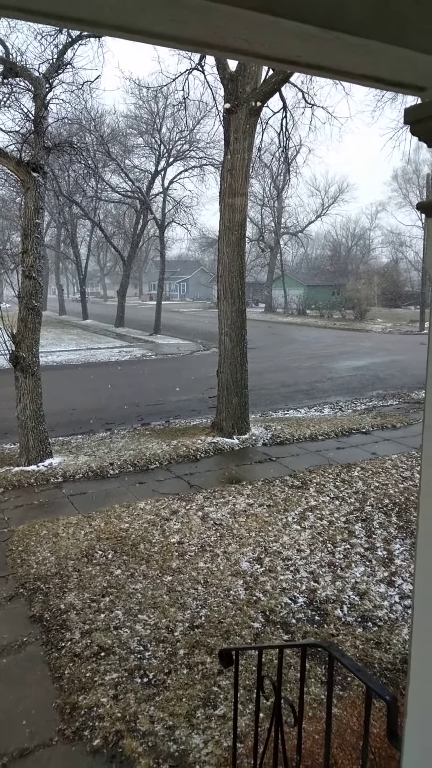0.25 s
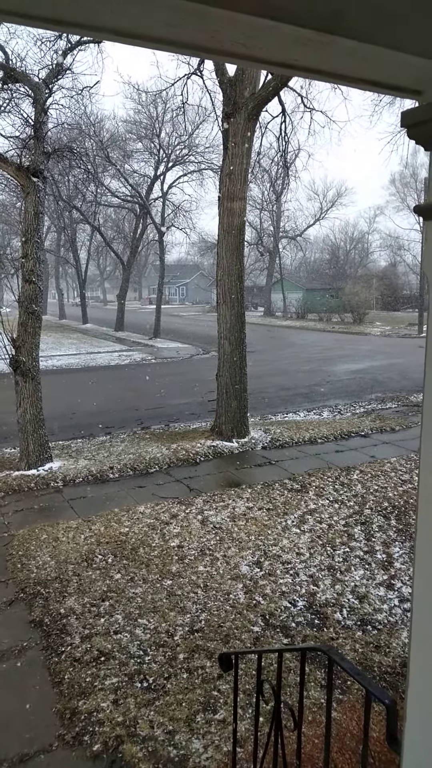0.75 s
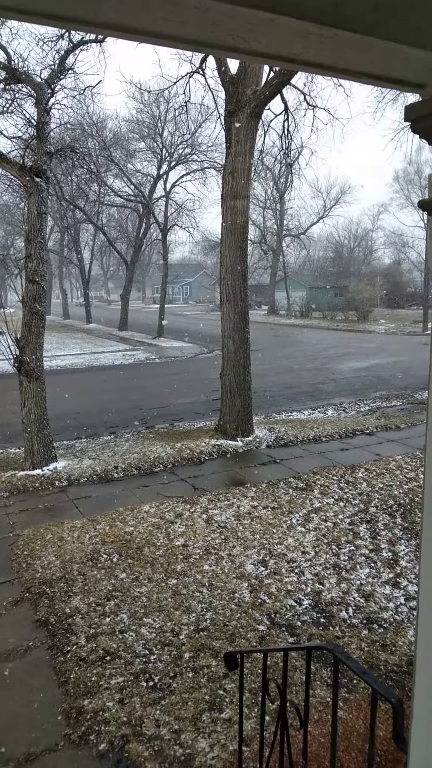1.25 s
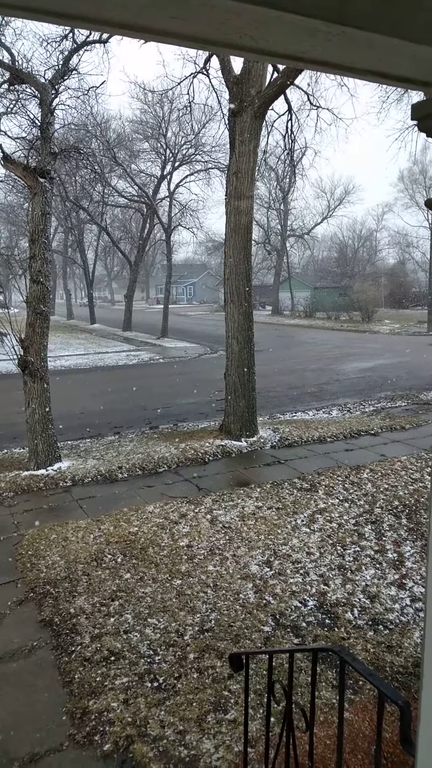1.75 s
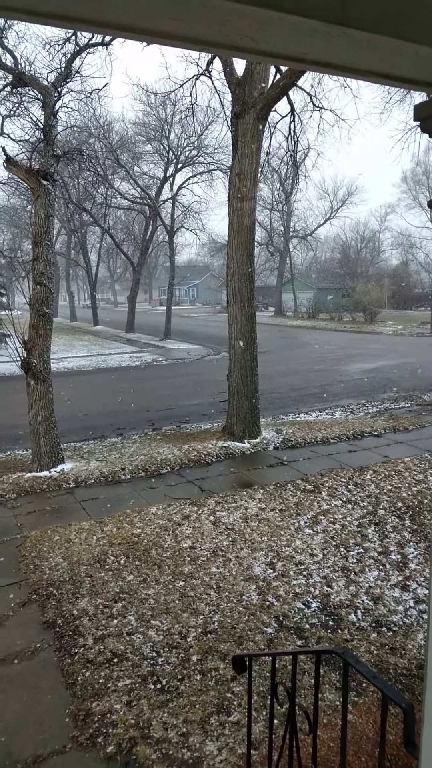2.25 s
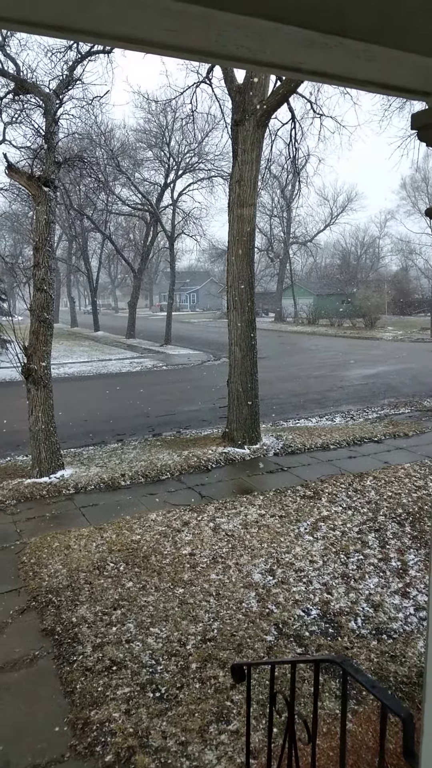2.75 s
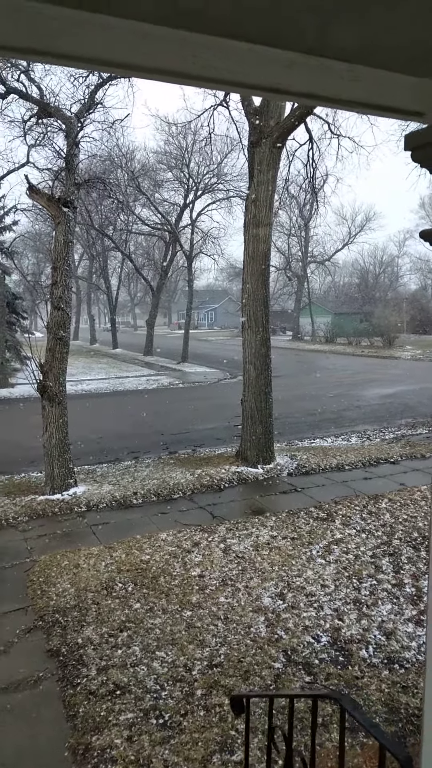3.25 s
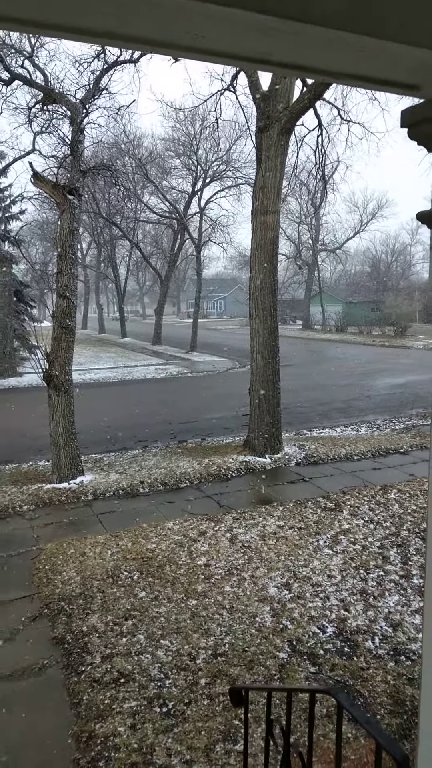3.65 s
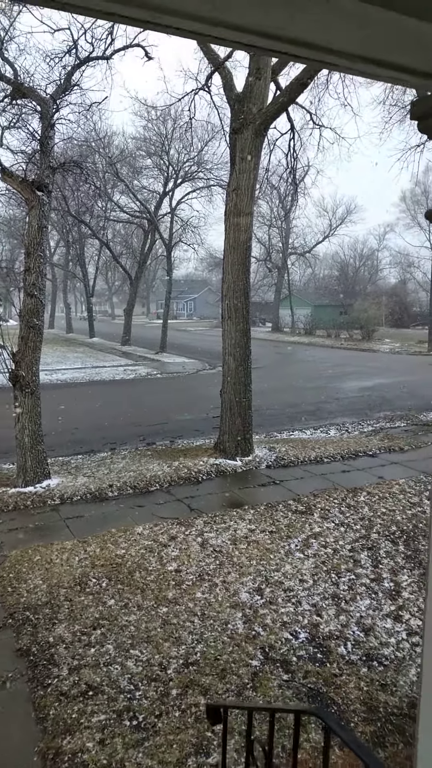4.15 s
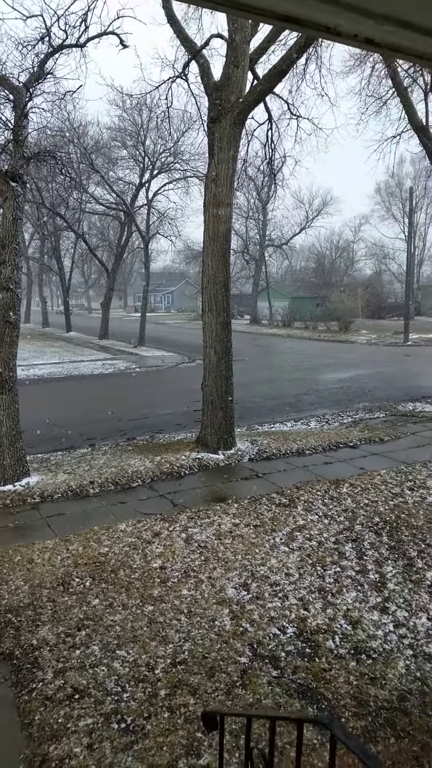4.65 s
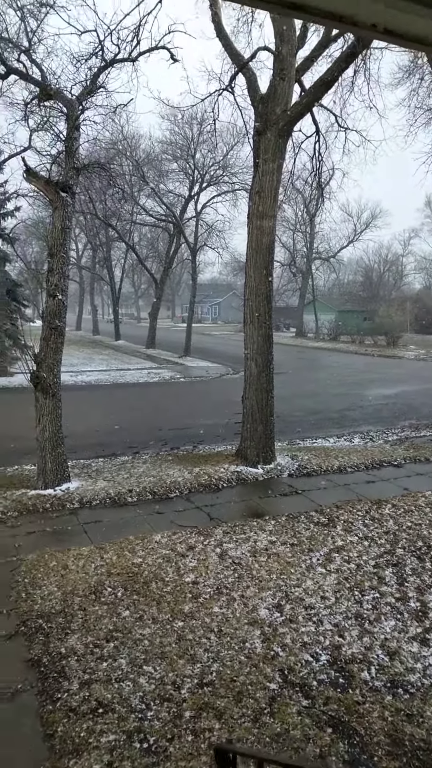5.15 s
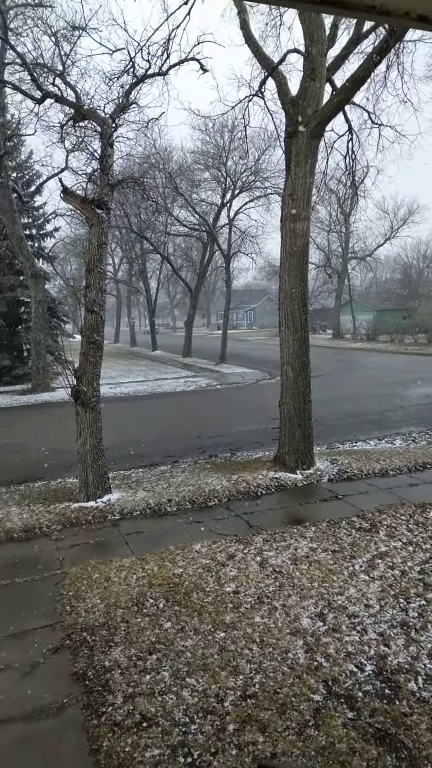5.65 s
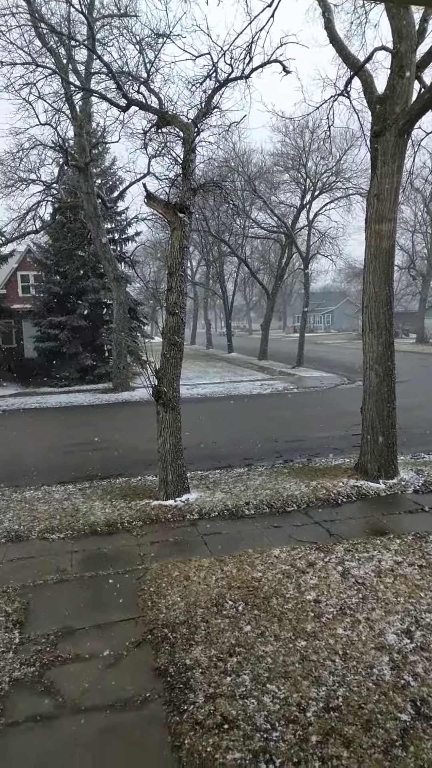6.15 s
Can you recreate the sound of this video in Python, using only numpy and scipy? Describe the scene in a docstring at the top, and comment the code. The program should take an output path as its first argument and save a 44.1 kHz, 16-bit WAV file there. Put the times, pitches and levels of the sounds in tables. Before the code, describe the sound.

Hard snow pellets tick irregularly with short grainy fizzes over a low steady town rumble and faint engine hum, with three brief hissy gusts.

```python
"""Snow pellets on a front garden

Heard from under a porch roof: hard pellets tick amid short bursts of grainy fizz, each ending abruptly.
Ticks and fizzes are filtered noise bursts with a ringing pitch; a few gusts hiss past with many fine grains.
Behind them the far shower hisses and patters, and a distant engine hums in the rumble and roar of the town.
Soft low swells of wavering tone come and go, and puffs of low noise thud on the two microphone ports."""
import sys
import numpy as np
from scipy import signal
from scipy.fft import rfft, irfft
from scipy.io import wavfile

SR = 44100
rng = np.random.default_rng(int(sys.argv[2]) if len(sys.argv) > 2 else 0)


def waveform_to_disk(signal):
    """Save audio, clipped to [-1, 1], as 16-bit WAV at the path in sys.argv[1]."""
    frames = np.transpose(np.atleast_2d(signal))
    scaled = np.clip(frames, -1, 1) * 32767
    samples = np.round(scaled).astype(np.int16)
    wavfile.write(sys.argv[1], SR, samples)


N = 282240
TIME = np.arange(N) / SR
TOP_HZ = 15900  # upper limit of ringing pitches and of the whole sound


def undb(db):
    """Turn decibels into an amplitude gain."""
    return 10 ** (np.asarray(db) / 20)


def unit(x):
    """Scale to an rms of one."""
    return x / np.sqrt(np.mean(x ** 2) + 1e-20)


def response(points, size):
    """Gain of a (freq_hz, level_db) outline at the bins of a transform, drawn over log frequency."""
    hz, db = np.transpose(points)
    bins_hz = np.fft.rfftfreq(size, 1 / SR) + 1
    return undb(np.interp(np.log(bins_hz), np.log(hz), db))


def colour(x, points, tilt_db=0, ring_hz=4000, ring_db=0, ring_octaves=0.15, keep_power=True, size=1024):
    """Causal, minimum-phase filter: an outline, a tilt in dB per octave and one broad resonance."""
    hz = np.fft.rfftfreq(size, 1 / SR) + 1
    octaves = np.log2(np.clip(hz, 1500, 10000) / 4000)  # the tilt levels off outside this range
    bump = 1 / (1 + (np.log2(hz / ring_hz) / ring_octaves) ** 2)
    gain = response(points, size) * undb(tilt_db * octaves + ring_db * bump)
    if keep_power:
        gain = unit(gain)
    # folding the cepstrum forward in time makes the filter minimum phase
    cepstrum = irfft(np.log(gain))
    cepstrum[1:size // 2] *= 2
    cepstrum[size // 2 + 1:] = 0
    kernel = irfft(np.exp(rfft(cepstrum)))
    return signal.fftconvolve(np.atleast_2d(x), kernel[None], axes=1)[:, :x.shape[-1]]


def noise(points, likeness):
    """Coloured stereo noise of rms one; likeness is the correlation of left and right."""
    spectra = rfft(rng.standard_normal((2, N))) * response(points, N)
    mid, side = irfft(spectra, N)
    return unit(np.sqrt(1 + likeness) * mid + np.sqrt(1 - likeness) * np.array([side, -side]))


def walk(rate):
    """Slow random wander with a spread near one: straight lines between rate random knots a second."""
    knots = rng.standard_normal(1024)
    return np.interp(TIME * rate, np.arange(len(knots)), knots)


def tone(hz, wander, flutter_db, rate=9):
    """Sine of rms one whose pitch wanders by a fraction of itself and whose level flutters."""
    phase = 2 * np.pi * np.cumsum(hz * (1 + wander * walk(rate))) / SR
    return unit(np.sin(phase) * undb(flutter_db * walk(rate)))


def grains(size, rate=450, ring_s=0.00054, bed=1.0):
    """Tiny uneven grains, rate a second, stand out of a finer bed; each port gets its own noise."""
    hits = (rng.random(size) < rate / SR) * undb(3 * rng.exponential(size=size).clip(0, 3))
    strength = signal.lfilter([1], [1, -np.exp(-1 / (ring_s * SR))], hits)
    return unit(np.hypot(bed, strength) * rng.standard_normal((2, size)))


def add(out, s, sound):
    """Mix a sound in at time s, cut at the end of the scene."""
    i = int(s * SR)
    n = max(min(sound.shape[1], N - i), 0)
    out[:, i:i + n] += sound[:, :n]


# Spectrum of the distant hiss: freq_hz, level_db
FAR_COLOUR = [(600, 18), (1200, 9), (2200, 15), (4000, 1.5), (6500, -14), (8500, -12), (12000, 10.5),
              (15500, -12)]
# Spectrum of pellet ticks, near and far: freq_hz, level_db
TICK_COLOUR = [(500, -4), (1400, -1), (2400, 1), (3600, 3.5), (5000, 0.5), (7500, 4), (10500, 1),
               (13000, 1), (16000, -9.5)]


def far_fall(hiss_db=-81.5, patter_db=-85, rate=70, ring_s=0.01, size=1024):
    """Faint wavering noise is the hiss of the whole shower; decaying noise bursts tick softly on the lawn."""
    hits = (rng.random(N) < rate / SR) * undb(2.6 * rng.standard_normal(N))
    decay = signal.fftconvolve(hits, np.exp(-np.arange(size) / SR / ring_s))[:N]
    patter = unit(colour(decay * rng.standard_normal((2, N)), TICK_COLOUR))
    hiss = undb(hiss_db + 1.7 * walk(20)) * noise(FAR_COLOUR, 0.056)
    return hiss + undb(patter_db) * patter


# Low-middle roar of the town over time: time_s, level_db (before the roar_db trim)
ROAR = [(0.0, -60), (1.7, -61.5), (3.7, -58.5), (4.2, -59.5), (6.4, -60)]
# Spectrum of the deep rumble: freq_hz, level_db
RUMBLE_COLOUR = [(15, 2), (28, 0), (50, -3), (70, -6), (110, -4.5), (160, -8.5), (220, -14), (320, -26),
                 (600, -59)]
# Spectrum of the roar: freq_hz, level_db
ROAR_COLOUR = [(120, -17.5), (200, -1), (270, 5.5), (400, 1), (480, -3), (630, -3.5), (800, -9.5),
               (1000, -14.5), (1400, -25), (2200, -38.5)]


def town(rumble_db=-54, roar_db=-1.0):
    """Steady deep noise, nearly the same on both sides, under a wider roar that wavers."""
    s, db = np.transpose(ROAR)
    roar_level_db = np.interp(TIME, s, db) + roar_db + 1.58 * walk(25)
    roar = noise(ROAR_COLOUR, 0.51) * undb(roar_level_db)
    return undb(rumble_db) * noise(RUMBLE_COLOUR, 0.96) + roar


# Engine balance: time_s, low_note_db, high_note_db (both before their trims), overtone_gain_db
ENGINE = [(0.0, -61.5, -63.5, -3.5), (2.1, -62.5, -69.5, 2.5), (2.39, -64.5, -55, 1),
          (3.1, -63, -63.5, 5.5), (4.6, -56.5, -59.5, 1), (6.4, -55, -66, 5.5)]
# Engine overtones: pitch_hz, level_db (before overtone_gain_db)
WHINE = [(323, -78), (388, -75.5), (614, -81.5)]


def engine(low_hz=83, high_hz=101, low_db=-2.5, high_db=-3.0):
    """Two wavering low sines trade strength, with faint wavering overtones above."""
    s, low, high, overtone_gain = np.transpose(ENGINE)
    hum = tone(low_hz, 0.028, 1.2) * undb(np.interp(TIME, s, low) + low_db)
    hum += tone(high_hz, 0.026, 4.2) * undb(np.interp(TIME, s, high) + high_db)
    overtones = sum(undb(db) * tone(hz, 0.00609, 3.3) for hz, db in WHINE)
    return hum + undb(np.interp(TIME, s, overtone_gain)) * overtones


# Wind puffs on the ports: crest_s, length_s, left_db, right_db
PUFFS = [(0.052, 0.079, -64, -47.5), (0.167, 0.15, -52, -47), (0.299, 0.015, -60, -33.5),
         (4.696, 0.021, -39, -33.5), (5.33, 0.038, -60, -43), (5.664, 0.053, -51, -35.5),
         (5.93, 0.36, -70, -47.5), (6.271, 0.021, -50, -29.5), (6.347, 0.071, -71, -40.5)]
# Spectrum of the wind eddies: freq_hz, level_db
PUFF_COLOUR = [(12, 6), (25, -0.5), (50, 5), (80, -6), (130, -14.5), (250, -48), (600, -79)]


def wind(left_breeze_db=-66, right_breeze_db=-59, waver_db=3):
    """A light breeze of low noise wavers on the ports, and stronger eddies thud on each separately."""
    eddies = noise(PUFF_COLOUR, 0)
    breeze_db = np.array([[left_breeze_db], [right_breeze_db]]) + waver_db * walk(4.3)
    out = eddies * undb(breeze_db)
    for s, length, left_db, right_db in PUFFS:
        shape = np.exp(-2 * ((TIME - s) / length) ** 2)
        puff = eddies * shape
        strength = np.sqrt(np.sum(puff ** 2, axis=1, keepdims=True) / np.sum(shape ** 2))
        out += puff / strength * undb([[left_db], [right_db]])
    return out


def ring_pitch(bright_db, zero_hz=3940, doubling_db=6, spread_octaves=0.2):
    """Ringing pitch in Hz: doubles per doubling_db of brightness, and varies at random."""
    octaves = bright_db / doubling_db + spread_octaves * rng.standard_normal()
    return min(zero_hz * 2 ** octaves, TOP_HZ)


def crack(bright_db, crack_s=0.0025, lag_s=0.00024, ring_db=9, right_db=-3.0, size=2048):
    """A decaying noise burst cracks on a surface and rings it; the right port hears it later and softer."""
    right_lag_s = lag_s * rng.uniform(0, 2.5)
    age = np.arange(size) / SR - np.array([[0], [right_lag_s]])
    burst = rng.standard_normal((2, size)) * (age >= 0) * np.exp(-np.abs(age) / crack_s)
    burst = colour(burst, TICK_COLOUR, bright_db, ring_pitch(bright_db), ring_db)
    # each side gets the energy of 2 ms at rms one, then the right is lowered
    burst = burst * np.sqrt(.002 * SR / np.sum(burst ** 2, axis=1, keepdims=True))
    return burst * undb([[0], [right_db]])


# Spectrum of the grainy fizz: freq_hz, level_db
FIZZ_COLOUR = [(200, -11), (450, 8), (900, 2.5), (1400, 0), (2300, 3), (3200, -3), (5000, -5.5), (7500, -3),
               (10500, -5), (13000, -7), (15500, -19)]
# Spectrum of the low-middle noise that rises with fizzes and gusts: freq_hz, level_db
LOW_MIDDLE_COLOUR = [(150, -24.5), (260, -4.5), (380, 4), (500, -3.5), (650, -3.5), (850, -15.5),
                     (1200, -16.5), (2000, -30), (4000, -53)]


def fizz_burst(db, length, bright_db, fizz_db=0.34, low_db=-34.5, low_share=0.48, sag_db=1.0,
               rise_s=0.002, stop_s=0.0045, tail_db=-17, tail_s=0.025,
               uneven_db=1.48, uneven_hz=130, ring_db=4.0, rate=380, bed=0.95, size=7168):
    """Grainy noise stops abruptly to a faint tail; low-middle noise rises along, less with a bright fizz."""
    t = np.arange(size) / SR
    stop = np.clip((length - t) / stop_s + 1, 0, 1)
    hold = stop * undb(sag_db * (1 - np.minimum(t / max(length, stop_s), 1)))
    tail = undb(tail_db) * np.exp(-np.maximum(t - length, 0) / tail_s)
    knots = rng.standard_normal(64)
    uneven = undb(uneven_db * np.interp(t * uneven_hz, np.arange(len(knots)), knots))
    shape = np.minimum(t / rise_s, 1) * np.maximum(hold, tail) * uneven
    grainy = grains(size, rate=rate, bed=bed) * shape
    fizz = colour(grainy, FIZZ_COLOUR, bright_db, ring_pitch(bright_db), ring_db)
    # the low-middle noise is partly common to both sides
    shared = rng.standard_normal(size) + rng.standard_normal((2, size))
    low_middle = colour(unit(shared) * shape, LOW_MIDDLE_COLOUR)
    return undb(db + fizz_db) * fizz + undb(low_db + low_share * db - bright_db) * low_middle


# Short bursts of grainy fizz: start_s, level_db (before trims), length_s, bright_db_per_octave
FIZZES = [(0.051, -66.5, 0.025, -0.5), (0.1, -73.5, .018, 0.5), (0.175, -72.5, 0.011, 2.5),
          (0.607, -68.5, 0.02, -1.5), (0.638, -66.5, 0.031, 2.5), (0.731, -68.5, 0.019, 1.5),
          (0.776, -69.5, 0.019, 0), (0.852, -67, 0.014, 1.5), (0.913, -60.5, 0.059, 3.5),
          (0.987, -63.5, 0.04, 2), (1.215, -71, .009, 1), (1.34, -67, 0.036, 2.5), (1.409, -66, 0.027, .5),
          (1.506, -70, 0.035, .5), (1.652, -67.5, 0.015, 1.5), (1.706, -71, 0.054, 3),
          (1.851, -63, 0.026, -0.5), (1.915, -67, 0.021, -1.5), (2, -63.5, 0.026, -1.5),
          (2.174, -62, 0.026, 7), (2.28, -64, 0.026, 7), (2.362, -74, 0.017, -1), (2.475, -69.5, 0.036, -1),
          (2.579, -61.5, 0.071, 2), (2.675, -66.5, 0.042, -0.5), (2.744, -66, 0.013, -2),
          (2.771, -68.5, 0.027, -6.5), (2.866, -62, .033, 2), (2.953, -69, 0.018, 0),
          (3.101, -66.5, 0.027, -0.5), (3.215, -65, 0.043, 0.5), (3.305, -66, .07, .5),
          (3.382, -59, 0.047, 0), (3.453, -68, .065, -0.5), (3.879, -63, 0.088, -1), (4.115, -63, 0.037, 3),
          (4.215, -65, 0.042, 0), (4.264, -68, 0.025, 0), (4.342, -66, 0.039, 2), (4.369, -59.5, 0.11, 0),
          (4.488, -67.5, 0.034, 0), (4.538, -67.5, 0.059, .5), (4.901, -67, 0.034, 0),
          (4.937, -62, 0.042, -0.5), (4.996, -64.5, 0.047, 1), (5.082, -66.5, 0.071, -1.5),
          (5.137, -62, 0.043, 5.5), (5.182, -60.5, .054, -.5), (5.274, -66.5, 0.038, -1),
          (5.454, -69.5, 0.028, 2), (5.494, -66.5, 0.079, 1.5), (5.556, -67, 0.012, 1),
          (5.597, -64.5, 0.024, -1), (5.792, -66.5, 0.0077, 0.5), (5.852, -70, 0.035, 0),
          (5.917, -64, 0.042, -3), (5.992, -67.5, 0.041, -1), (6.051, -59, 0.019, 13),
          (6.062, -65.5, 0.038, 0.5), (6.355, -70, 0.0063, -5)]
# Single hard pellets: start_s, level_db (before the tick_db trim), bright_db_per_octave
TICKS = [(0.651, -60, -0.5), (0.925, -43.5, 5), (0.9846, -47, 13), (1.356, -57, 1.5), (1.8531, -49, 0.5),
         (1.914, -59, 1.5), (2.176, -62, 8), (2.2905, -53, -3), (2.36, -62, -0.5), (2.5924, -49, 6.5),
         (2.604, -48, 2.5), (2.7747, -62, -3), (2.873, -47, 0), (3.384, -52, -0.5), (3.4054, -54, -4),
         (3.4935, -59, -4), (3.7136, -48, 4.5), (3.9183, -52.5, 2), (4.095, -62, -2), (4.131, -56, -9),
         (4.3712, -47.5, -4.5), (4.4051, -48.5, -1.5), (4.4976, -51.5, 1.5), (4.539, -56, 1),
         (4.939, -53, -1), (5.0076, -53, -2), (5.107, -51.5, -2), (5.1358, -44.5, 9), (5.1474, -48, 6),
         (5.2075, -47, 0), (5.352, -42.5, 2.5), (5.5582, -51.5, -2), (5.6041, -55, -3.5),
         (5.916, -54.5, -3), (6.0449, -43, 15), (6.0742, -52, 5.5)]


def pellets(tick_db=-2.1, first_db=-3.0, second_db=-2.5, spread_db=2.0):
    """Hard pellets crack alone; each fizz starts with a soft tick and has a second one at a random moment."""
    out = np.zeros((2, N))
    for s, db, bright_db in TICKS:
        add(out, s, undb(db + tick_db) * crack(bright_db))
    for s, db, length, bright_db in FIZZES:
        add(out, s, fizz_burst(db, length, bright_db))
        second_s = length * rng.random()
        for delay, offset_db in ((0, first_db), (second_s, second_db)):
            soft_tick_db = db + offset_db + spread_db * rng.standard_normal()
            add(out, s + delay, undb(soft_tick_db) * crack(bright_db))
    return out


def strays(per_s=7, level_db=-76.5, spread_db=2.3, length_s=0.0097,
           landing_db=2.0, bright_spread_db=3.0, count=64):
    """Faint pellets land at random, one in each slot of 1 / per_s, with a tick and a very short fizz."""
    out = np.zeros((2, N))
    times = (np.arange(count) + rng.random(count)) / per_s
    for s, (strength, hardness, reach) in zip(times, rng.standard_normal((count, 3))):
        db = level_db + spread_db * strength
        bright_db = bright_spread_db * hardness
        add(out, s, fizz_burst(db, length_s * 2 ** (reach / 2), bright_db))
        add(out, s, undb(db + landing_db) * crack(bright_db))
    return out


# Soft low swells in the town noise: crest_s, half_length_s, pitch_hz, level_db (before the swell_db trim)
SWELLS = [(1.998, 0.11, 263, -62.5), (2.499, 0.075, 324, -60), (2.786, 0.048, 333.4, -57),
          (2.95, 0.073, 388, -67), (3.404, 0.08, 402.4, -59.5), (4.153, 0.085, 286.3, -60),
          (4.398, .08, 335, -58.5), (4.968, 0.11, 360, -58), (5.202, 0.19, 325, -60.5),
          (5.355, 0.067, 333, -59.5)]


def swells(swell_db=-1):
    """Sines of unsteady pitch rise and fall smoothly as brief soft lumps of low tone."""
    out = np.zeros((2, N))
    for crest, half_length, hz, db in SWELLS:
        shape = np.hanning(int(2 * half_length * SR))
        lump = shape * tone(hz, 0.08, 0.53, rate=60.2)[:len(shape)]
        add(out, crest - half_length, undb(db + swell_db) * lump[None])
    return out


# Hissy gusts: start_s, crest_s, end_s, crest_level_db (before the gust_db trim), end_drop_db,
# bright_db_per_octave
GUSTS = [(3.698, 3.775, 3.842, -53, 8.5, -1.5), (4.664, 4.74, 4.828, -47, 17.5, 0.5),
         (5.32, 5.359, 5.417, -53.5, 11, 0)]
# Spectrum of a gust's rush: freq_hz, level_db
GUST_COLOUR = [(200, 5), (600, -2.5), (1200, -0.5), (1600, -0.5), (1900, -1.5), (2400, -3), (2900, -4.5),
               (3800, -4.5), (5500, -9.5), (7500, -3), (10500, -7.5), (13000, -9), (15500, -30)]
# Resonances in the crest of a gust: pitch_hz, width_hz, level_db (relative to one another)
GUST_RINGS = [(1856, 150, -6), (2150, 60, -7.5), (2410, 27, -5), (3130, 17, -10.5)]


def gusts(gust_db=2.0, crest_db=-3.0, edge_s=0.0028, waver_db=0.06, waver_hz=110,
          direct=0.18, lag_s=0.00053, low_db=-18):
    """Fine-grained noise swells smoothly to a ringing crest over low-middle noise, and dies away."""
    out = np.zeros((2, N))
    loudest_db = max(row[3] for row in GUSTS)
    for start, crest, end, db, drop_db, bright_db in GUSTS:
        t = np.arange(start, end + .02, 1 / SR)
        away = np.interp(t, [start, crest, end], [1, 0, 1])  # 0 at the crest, 1 at the ends
        edges = np.clip(np.minimum(t - start, end - t) / edge_s, 0, 1)
        waver = waver_db * walk(waver_hz)[:len(t)]
        swell = edges * undb(db + gust_db - drop_db * away ** 1.95 + waver)
        # the gust passes on the left: the direct part of the rush reaches the right port later
        left, scattered = grains(len(t))
        right = direct * np.roll(left, int(lag_s * SR)) + np.sqrt(1 - direct ** 2) * scattered
        rush = np.array([left, right])
        rings = np.zeros_like(rush)
        for hz, width, ring_db in GUST_RINGS:
            b, a = signal.iirpeak(hz, hz / width, fs=SR)
            rings += undb(ring_db) * unit(signal.lfilter(b, a, rush))
        # weaker gusts ring less and have more low-middle noise
        ringing = undb(crest_db + 1.05 * (db - loudest_db)) * (1 - away)
        low_middle = undb(low_db + loudest_db - db) * colour(rush, LOW_MIDDLE_COLOUR)
        add(out, start, swell * (colour(rush, GUST_COLOUR, bright_db) + ringing * rings + low_middle))
    return out


def scene():
    """Pellets and gusts in front of the far shower, the town, the engine and the wind."""
    return far_fall() + town() + engine() + wind() + pellets() + strays() + swells() + gusts()


# Response of the left microphone port: freq_hz, gain_db
LEFT_PORT = [(800, 1.5), (2500, 2), (5200, 0.5), (6300, 2), (7300, 5.5), (7900, -1.5), (8700, -11),
             (10000, -10.5), (12500, -16.5), (15500, -4.5)]
# Response of the right microphone port: freq_hz, gain_db
RIGHT_PORT = [(800, 2), (2500, -1.5), (5200, -2.5), (7500, -10), (8700, -6.5), (10000, -1.5), (11200, -7),
              (12500, -14), (15500, -12)]


def record(dry):
    """Each port colours the treble in its own way; a steep low-pass cuts the top."""
    left = colour(dry[0], LEFT_PORT, keep_power=False)
    right = colour(dry[1], RIGHT_PORT, keep_power=False)
    top_cut = signal.ellip(10, .2, 70, TOP_HZ, fs=SR, output="sos")
    return signal.sosfilt(top_cut, np.vstack([left, right]))


dry = scene()
out = record(dry)
waveform_to_disk(out)
```